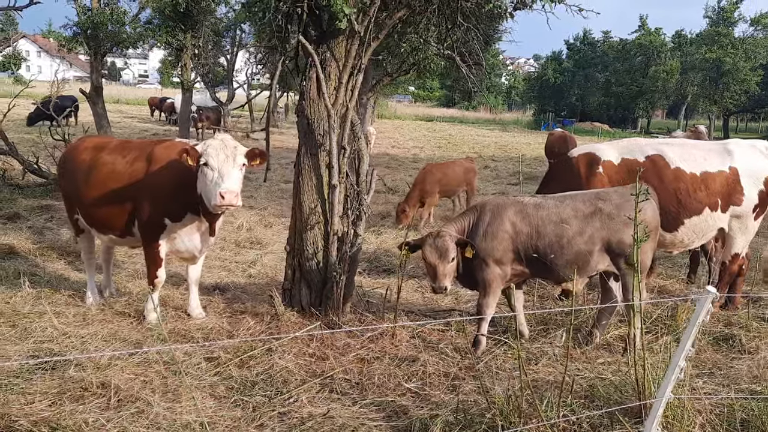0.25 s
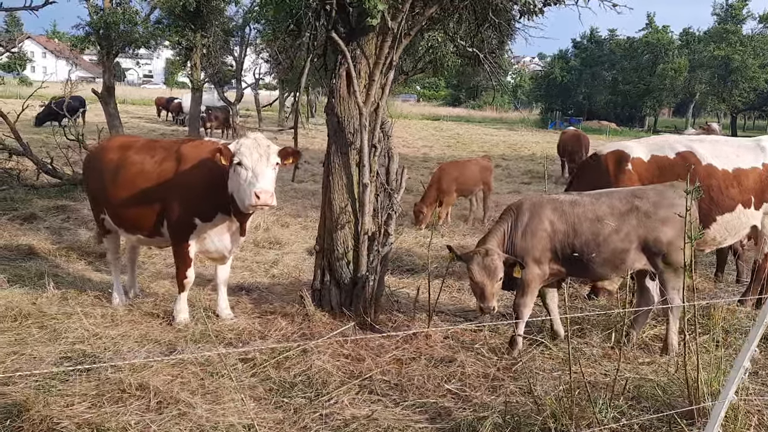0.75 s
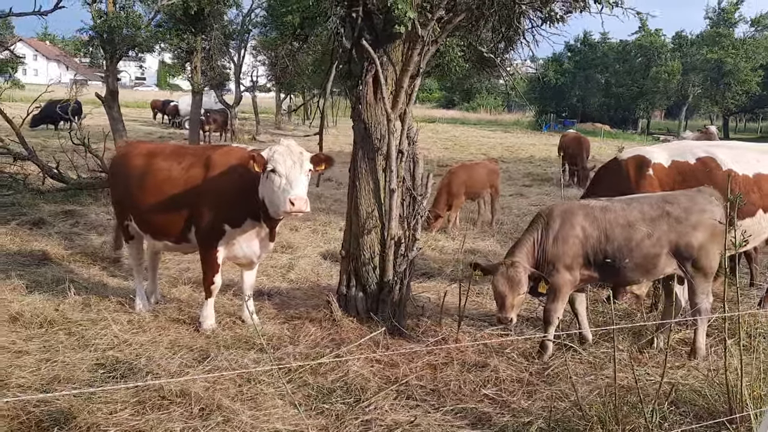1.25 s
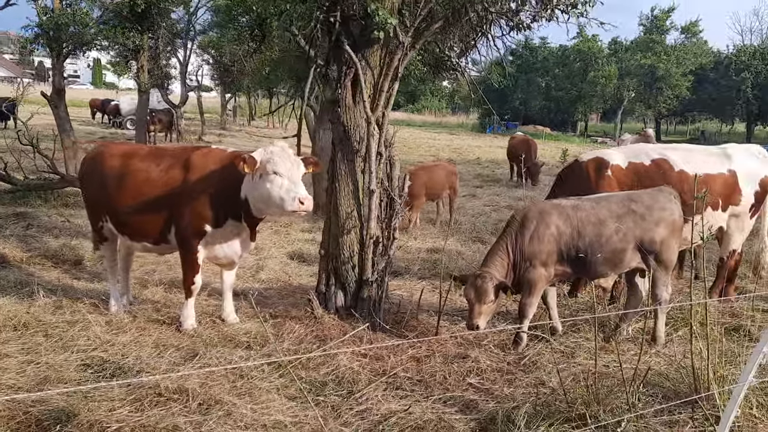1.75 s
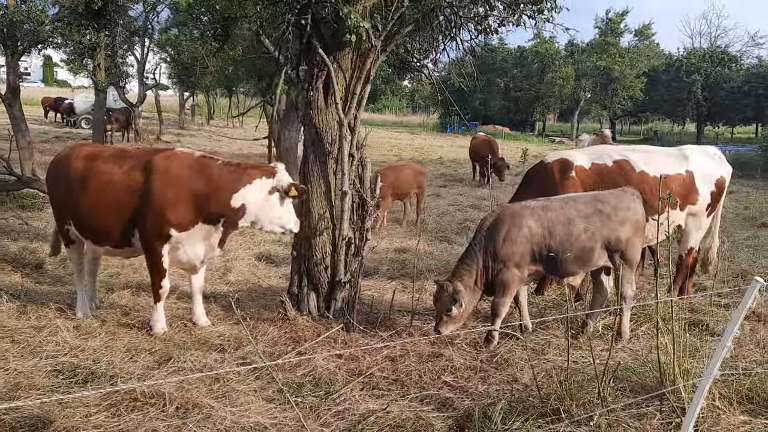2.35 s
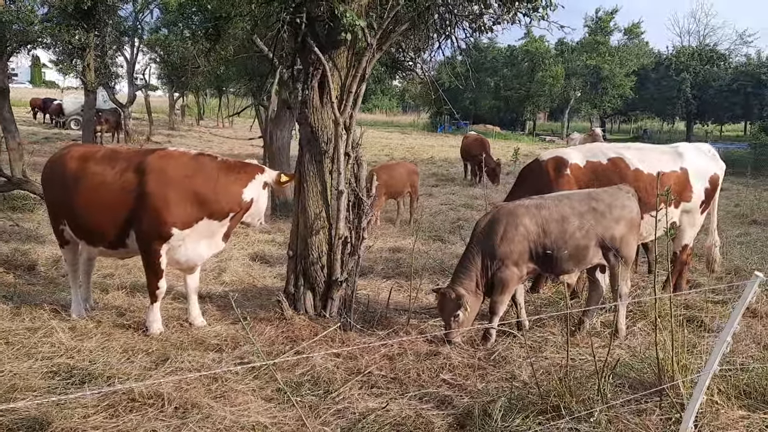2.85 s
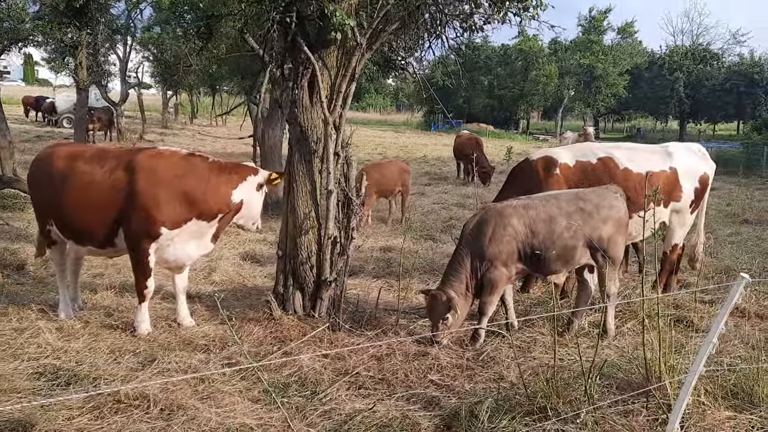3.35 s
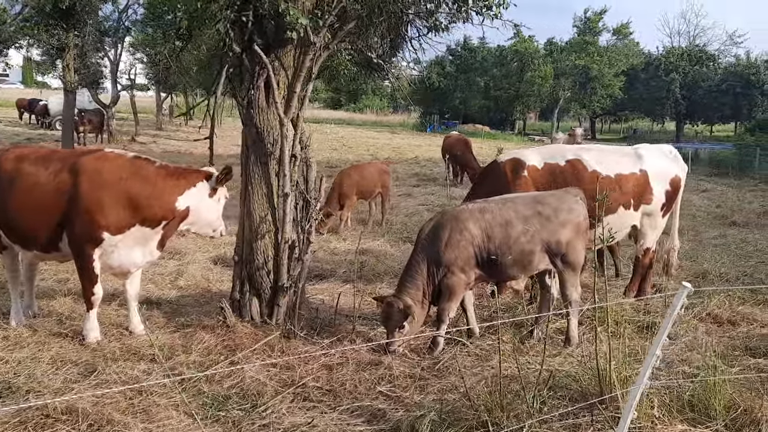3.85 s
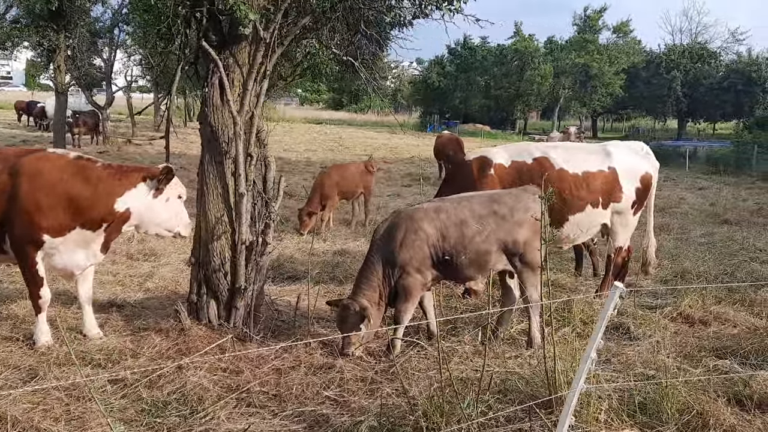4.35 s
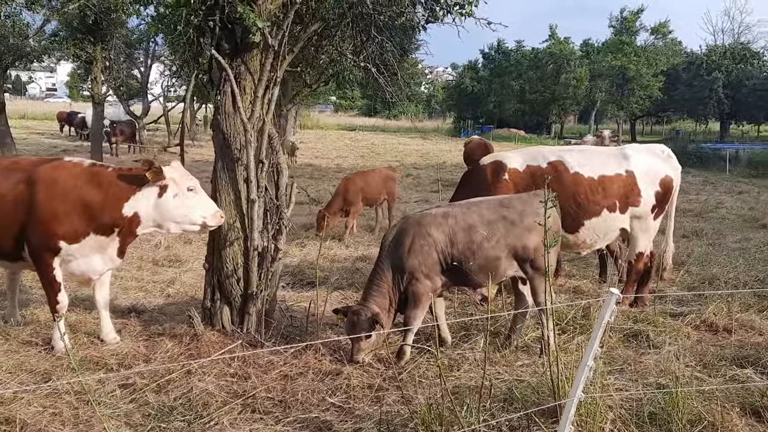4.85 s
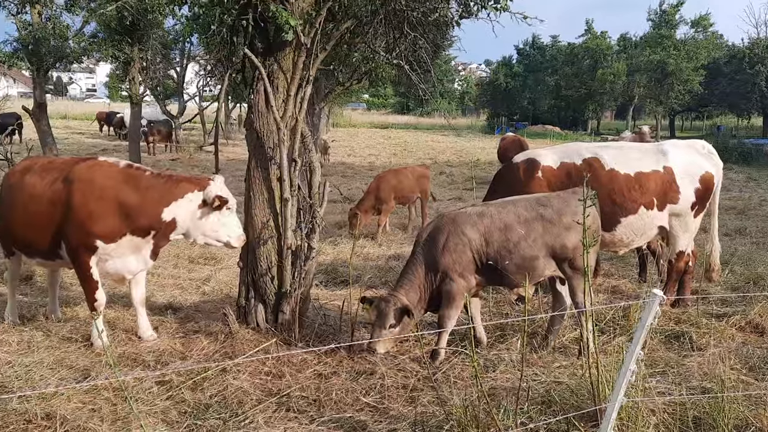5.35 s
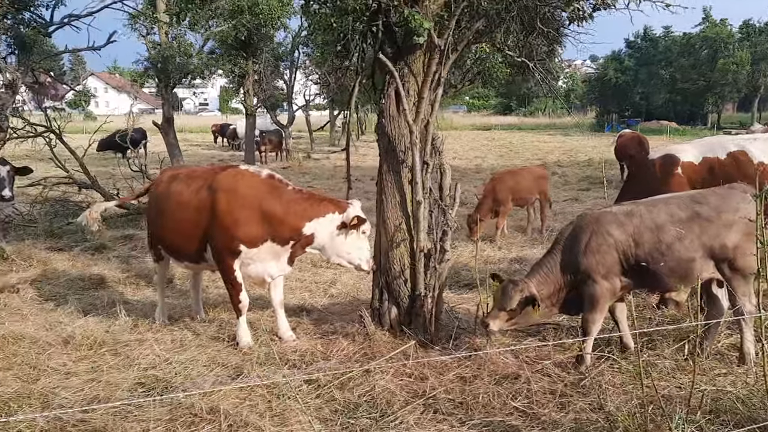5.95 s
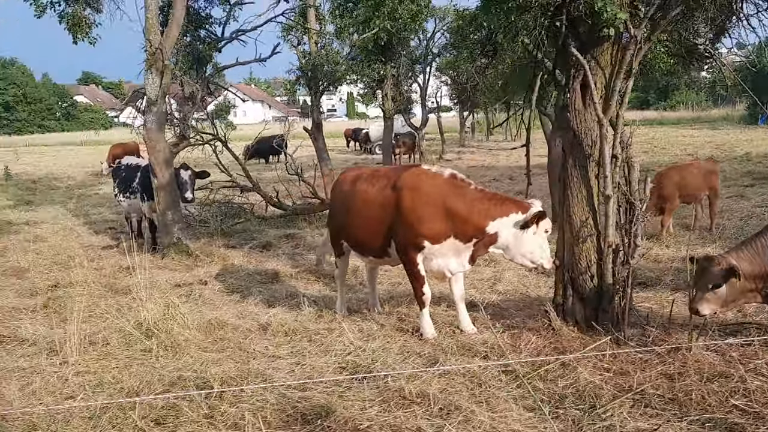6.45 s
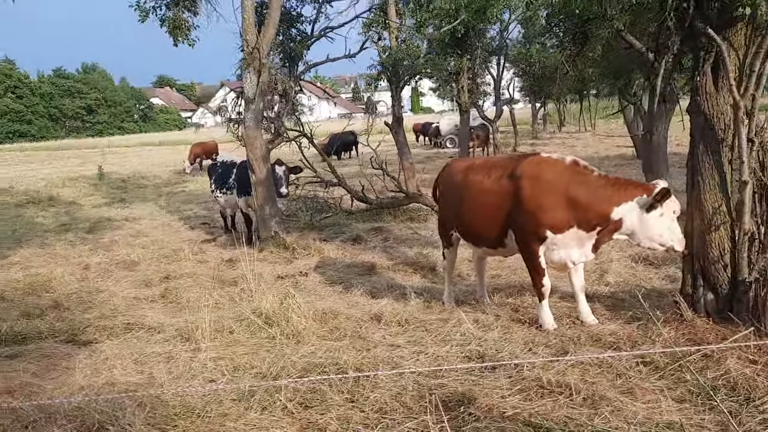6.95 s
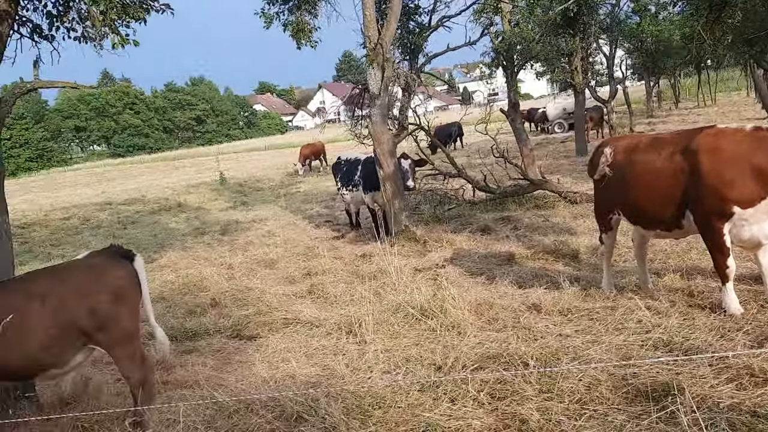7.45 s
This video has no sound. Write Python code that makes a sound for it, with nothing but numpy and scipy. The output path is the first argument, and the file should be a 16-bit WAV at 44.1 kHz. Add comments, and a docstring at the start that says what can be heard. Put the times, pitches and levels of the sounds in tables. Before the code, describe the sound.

A cow gives one long low moo that ends in a breathy break, over faint bird calls, grassy rustle and far traffic hum in an open pasture.

```python
"""A cow holds one long moo in a dry pasture; a songbird whistles and small birds buzz, stalks snap, leaves and
grass hiss, far traffic hums and wind rumbles on the microphone ports.
The moo sums overtones of one fold pulse shaped by a throat, with breath noise puffed each cycle. Whistles are
bent sines, buzzes are frequency-modulated tones, snaps are struck resonances. Hiss, hum and rumble are noise
bands that flicker; breeze and gusts drive hiss and rumble. The stereo rows are the left and right port."""
import sys
import numpy as np
from scipy import signal
from scipy.fft import rfft, irfft
from scipy.io import wavfile
from scipy.ndimage import uniform_filter1d

SR = 44100
rng = np.random.default_rng(int(sys.argv[2]) if len(sys.argv) > 2 else 0)


def materialize(psi):
    """Save the field psi as 16-bit PCM at rate SR to the path in sys.argv[1].

    A 1-D psi becomes a single channel; in a 2-D psi each row is a channel.
    """
    bounded = np.clip(np.atleast_2d(psi).T, -1, 1)
    quanta = np.round(bounded * 32767).astype(np.int16)
    wavfile.write(sys.argv[1], SR, quanta)


N = 339369   # samples

# Uneven course of the breeze: time_s, leaf_hiss_db (before the port balance), wind_rumble_db
BREEZE = [(0.0, -79, -61.5), (0.23, -72.5, -70.5), (.55, -77, -65), (0.72, -72.5, -66.5), (1.2, -78, -60.5),
          (1.48, -72, -57), (1.84, -76.5, -68), (1.95, -69.5, -71), (2.31, -71.5, -64),
          (2.61, -78.5, -66.5), (2.83, -67, -49), (3.11, -70.5, -59.5), (3.47, -55.5, -62.5),
          (4.1, -66, -64), (4.45, -70, -69), (4.82, -57.5, -65.5), (4.93, -76, -68.5), (5.23, -62, -70.5),
          (5.72, -75, -71), (6.15, -64.5, -58), (6.37, -78.5, -62.5), (6.56, -70, -62), (6.85, -83, -77),
          (7.17, -66.5, -66), (7.42, -68.5, -63), (7.7, -80, -65)]
HALVES = np.array([[.5], [-.5]])   # splits a left-minus-right difference over the two ports


def moo():
    """Source-filter principle: harmonics of the vocal folds pass the throat, with breath modulated each cycle."""
    # Voice level and vocal-tract shape through the moo: time_s, level_db, open_mouth_db, bright_throat_db
    moo_course = [(2.56, -68, -30, -29), (2.64, -60.5, -10, -14), (2.69, -50.5, -15.5, -8.5),
                  (2.794, -38, -28, -12.5), (2.93, -39, -17, -5), (3.278, -34.5, -9, -5.5),
                  (3.54, -35, -6.5, -6.5), (3.65, -36, -7, 0.5), (3.79, -37.5, -5, -2),
                  (3.99, -38.5, -12, -3), (4.02, -44, -10, -8), (4.045, -39, -20, -14),
                  (4.085, -58, -1, -2), (4.15, -74, 10, 11)]
    # Overtones at the loudest moment: multiple_of_pitch, level_db
    overtones = [(1, -30), (2, -3), (3, -20), (4, -12), (5, -12.5), (6, -15.5), (7, -17.5), (8, -9),
                 (9, -13), (10, -11.5), (11, -3), (12, -14), (13, -14), (14, -19.5), (15, -36.5),
                 (16, -25.5), (17, -29.5), (18, -23), (19, -25.5), (20, -23), (21, -22), (22, -22),
                 (23, -23.5), (24, -33.5), (25, -21), (26, -21), (27, -27.5), (28, -43), (29, -57),
                 (30, -56), (31, -33), (32, -39), (33, -35.5), (34, -37), (35, -36), (36, -41), (37, -37),
                 (38, -33), (39, -52), (40, -44), (41, -40), (42, -49)]
    # Where level, mouth, throat and top act: frequency_hz
    control_hz = [340, 800, 1800, 3500]
    break_s, break_rise_s = 4.025, .09   # the voice breaks into breath, which takes over in the time before
    voiced_breath_db, broken_breath_db = -17.5, -3   # breath against the level curve
    top_follows = 0.38   # the top overtones follow mouth and throat by this share
    nose_hz = 1480   # rings while the mouth is still closed

    first, fade, (level_db, mouth_db, throat_db) = in_time(moo_course)
    size = len(fade)
    t = (first + np.arange(size)) / SR
    hz = moo_pitch(t, break_s)
    breath_db = np.interp(t, [break_s - break_rise_s, break_s], [voiced_breath_db, broken_breath_db])
    jitter = .0008 + .12 * from_db(breath_db) ** 3   # the breathier, the less regular the folds
    phase = 2 * np.pi * np.cumsum(hz * (1 + jitter * drift(85, size=size))) / SR

    held = np.argmax(level_db)   # the overtone table holds at full voice
    top_db = top_follows * (mouth_db + throat_db)
    controls = np.array([0 * hz, mouth_db, throat_db, top_db])
    controls = controls - controls[:, [held]]
    unrest = .015 * drift(2.5, size=size)   # tongue and jaw never hold still
    orders, orders_db = np.transpose(overtones)
    out, turn = np.zeros((2, N)), ringing_phase(orders_db)
    for k in orders:
        place = np.interp(np.log(k * hz[held]), np.log(control_hz), np.arange(4))
        low = min(int(place), 2)
        shape_db = controls[low] + (place - low) * (controls[low + 1] - controls[low])
        if k > 3:   # upper overtones slide through the throat's resonances as the pitch moves
            throat_order = k * hz / hz[held] * (1 + unrest * min(k / 14, 1))
            shape_db += np.interp(throat_order, orders, orders_db)
            shape_db -= .5 * np.minimum(controls[1], 0) * np.exp(-((k * hz - nose_hz) / 130) ** 2)
        else:
            shape_db += orders_db[int(k) - 1]
        # moving air makes high overtones waver, a little apart at each port
        unsteady = min(k / 9, 1)
        port_wobble = np.array([drift(4, size=size), drift(4, size=size)])
        wobble_db = unsteady * (2 * drift(5, size=size) + 1.6 * port_wobble)
        apart = unsteady * 0.5 * drift(1.5, size=size) * [[1], [-1]]   # radians
        gain = np.sqrt(2) * from_db(level_db + shape_db + wobble_db) * fade
        pulse_phase = turn[int(k)] - 0.0316 * k * k   # the square term disperses the pulse
        add(out, first, gain * np.cos(k * phase + apart + pulse_phase))

    puffs = rng.standard_normal((3, size)) * (1 + 0.33 * np.cos(phase))
    puffs = puffs[0] + 0.16 * puffs[1:]   # mostly shared by the ports
    add(out, first, throat_breath(puffs) * from_db(level_db + breath_db) * fade)
    # the ground bounce arrives at a different moment at each port
    left = out[0] + 0.38 * late(out[0], 0.00034)
    right = late(out[1], .00007) + .5 * late(out[1], 0.00039)
    # thin nostril hiss reaches the left port only
    nostril = signal.sosfilt(signal.butter(4, 8800, "high", fs=SR, output="sos"), puffs[0])
    add(left, first, rms_one(nostril) * from_db(level_db - 25.5) * fade)
    voice = np.array([left * from_db(1.5), right * from_db(-1.5)])
    return voice + from_db(-15) * trees(voice, t60=.4)


def moo_pitch(t, break_s):
    """Exponential relaxation in Hz: climbs to the held note, sags as the air runs out, flips up at the break."""
    climb_from_s, held_hz, rise_hz, rise_s = 2.48, 169.7, 44, .17   # rise_s is a time constant
    sag_hz, sag_s = 24, .04
    break_hz, flip_hz, fall_s = 163, 40, .025   # after the break it falls back with this time constant
    climb = held_hz - rise_hz * np.exp(-(t - climb_from_s) / rise_s)
    voiced = climb - sag_hz * np.exp(np.minimum(t - break_s, 0) / sag_s)
    broken = break_hz + flip_hz * np.exp(-np.maximum(t - break_s, 0) / fall_s)
    return uniform_filter1d(np.where(t < break_s, voiced, broken), size=600)


def ringing_phase(orders_db):
    """Minimum phase from the log spectrum: every fold pulse starts sharply and then rings in the throat."""
    level = np.log(from_db(np.pad(orders_db, (1, 64 - len(orders_db)), "edge")))
    folded = irfft(level)
    folded[1:64] *= 2
    folded[65:] = 0
    return rfft(folded).imag


def throat_breath(puffs):
    """Formant filtering: parallel resonances of alternating sign color the turbulent breath."""
    # Resonances of the breath: centre_hz, width_hz, level_db
    breath_bands = [(146, 48, 1), (310, 77, 7.5), (825, 560, -5.5), (1360, 270, 1), (1920, 270, -3),
                    (2130, 73, 2.5), (3830, 700, -5), (6040, 1000, -28)]
    bands = [(-1) ** k * from_db(db) * resonance(puffs, hz, width)
             for k, (hz, width, db) in enumerate(breath_bands)]
    return rms_one(sum(bands))


def songbird():
    """Pure tones with discrete reflections: walls and tree rows echo the whistles, leaves blur them."""
    # Whistled notes: start_s, length_s, first_hz, turn_hz, last_hz, loudest_db (before port balance), loudest_share
    notes = [(1.05, 0.16, 1585, 1970, 1815, -73.5, 0.19), (1.24, 0.079, 1620, 1660, 1870, -74.5, 0.54),
             (1.29, 0.2, 2255, 1970, 2510, -72.5, 0.83), (4.07, 0.2012, 1800, 1816, 1940, -71, .1),
             (4.15, .22, 2056, 2016, 2430, -64.5, 0.75), (4.4, 0.18, 2576, 2596, 2590, -61, 0.74),
             (4.59, 0.216, 2190, 2140, 2120, -62, 0.4), (6.09, 0.19, 1554, 1720, 1920, -64, 0.43),
             (6.41, 0.21, 2340, 1980, 2497, -68.5, 0.49)]
    # Echoes from walls and tree rows: delay_s, level_db
    echoes = [(.065, -8), (.13, -21), (.2, -20.5), (.31, -16)]
    song = whistles(notes)
    song = song + sum(from_db(db) * late(song, delay_s) for delay_s, db in echoes)
    ports = np.array([song * from_db(7.0), late(song, 0.00049) * from_db(-1.5)])
    return ports + from_db(-2) * trees(song, t60=.3)


def rising_tones():
    """Pure tones without reflections: faint glides rise before the moo and near its end, equal at both ports."""
    # Gliding notes: start_s, length_s, first_hz, turn_hz, last_hz, loudest_db, loudest_share
    glides = [(2.38, .3, 339, 373, 438, -69, .4), (3.89, 0.082, 2280, 2470, 3000, -53.5, 0.47)]
    return whistles(glides)


def whistles(notes):
    """Frequency glide of near sines that waver in strength; each note can bend once and swells once."""
    turn_share, settle_share = 0.31, .85   # of the length: where a note turns and reaches its last pitch
    start_db, end_db = -5.5, -7   # ends of a note against its loudest point
    out = np.zeros(N)
    for s, length, first_hz, turn_hz, last_hz, db, loudest in notes:
        first, fade, (share,) = in_time([(s, 0), (s + length, 1)], fade_s=0.013)
        hz = np.interp(share, [0, turn_share, settle_share], [first_hz, turn_hz, last_hz])
        level_db = db + np.interp(share, [0, np.clip(loudest, .02, .98), 1], [start_db, 0, end_db])
        tone = np.sin(2 * np.pi * np.cumsum(hz * (1 + 0.004 * drift(57, size=len(hz)))) / SR)
        add(out, first, np.sqrt(2) * tone * fade * from_db(level_db + 3.9 * drift(30, size=len(hz))))
    return out


def buzzes():
    """Frequency modulation: a warble sweeps a tone, a faster rasp roughens it, two upper partials ride above."""
    # Buzzing calls: start_s, length_s, first_hz, last_hz, after_attack_db, before_release_db,
    # sweep_depth (share of pitch, weighted below), left_minus_right_db, upper_partials_db,
    # direct_db (share of power heard directly; the rest comes scattered by the leaves)
    calls = [(0.101, 0.31, 4770, 3800, -65.5, -68, 0.14, 0, -7, -9),
             (0.796, 0.43, 4090, 3236, -59.5, -70.5, 0.19, 3.5, -15, -4),
             (1.328, 0.35, 4210, 4006, -58.5, -67, 0.12, 2.5, -16, -5),
             (1.618, 0.55, 3600, 3304, -72.5, -67, .17, 4, -10, -8.5),
             (2.374, .4, 2550, 2636, -69.5, -71, 0.048, -2, -32, -6),
             (2.663, 0.33, 4370, 3860, -54, -56, .2, 1.05, -15, -3.5),
             (5.297, 0.27, 4274, 3794, -57.5, -52, 0.14, 0.5, -13, -1.5),
             (5.824, 0.66, 4090, 2920, -61, -67.5, 0.15, 2.5, -15.5, -4.5),
             (6.715, 0.08, 3500, 3570, -60.5, -70, 0.047, 8.5, -24, -1),
             (6.796, 0.36, 3985, 3780, -60.5, -63.5, 0.14, 3.2, -15, -4.5),
             (7.09, 0.2, 4660, 3980, -47, -54, 0.098, 2.5, -8, -5),
             (7.292, 0.2, 4190, 3670, -64.5, -68.5, 0.26, 3, -15, -2.5)]
    warble_hz, rasp_hz = 43.1, 208
    attack_s, release_s, ends_db = .05, .08, -8
    direct, hidden = np.zeros((2, 2, N))
    for s, length, first_hz, last_hz, early_db, late_db, depth, side_db, upper_db, direct_db in calls:
        envelope = [(s, early_db + ends_db), (s + attack_s, early_db),
                    (s + max(length - release_s, attack_s), late_db), (s + length, late_db + ends_db)]
        first, fade, (level_db,) = in_time(envelope, fade_s=0.031)
        size = len(fade)
        hz = np.geomspace(first_hz, last_hz, size)
        warble = 2 * np.pi * np.cumsum(warble_hz * (1 + 0.0397 * drift(5.43, size=size))) / SR
        rasp = 2 * np.pi * np.cumsum(rasp_hz * (1 + 0.0932 * drift(18.6, size=size))) / SR
        swing = .3 + .85 * np.sin(warble) + .4 * np.sin(rasp) + .3 * drift(120, size=size)
        phase = 2 * np.pi * np.cumsum(hz * (1 + depth * swing)) / SR
        beat = from_db(-30 * depth * np.sin(warble) + 3 * drift(100, size=size))   # loudest at the low turn
        upper = np.sin(1.5 * phase) + 0.52 * np.sin(1.85 * phase)
        tone = (np.sin(phase) + from_db(upper_db) * upper) * beat
        call = rms_one(tone) * fade * from_db(level_db + HALVES * side_db)
        direct_gain = from_db(min(direct_db, 0))
        add(direct, first, call * direct_gain)
        add(hidden, first, call * np.sqrt(1 - direct_gain ** 2))
    return np.array([direct[0], late(direct[1], .0004)]) + trees(hidden, t60=.3)


def snaps():
    """Impulsive excitation of a broad resonance: stalks break sharply and small knocks die in noise."""
    # Snapping stalks and knocks: start_s, peak_db (before the split), centre_hz, t60_s, left_minus_right_db
    breaks = [(.668, -49.5, 597, 0.011, 5), (0.671, -50.5, 2030, 0.0067, 12), (.671, -50, 7060, 0.0061, 13),
              (.816, -56, 4500, 0.013, 5), (1.037, -50, 5900, 0.0092, 0), (1.064, -53, 5000, 0.0092, -8),
              (1.93, -55, 1010, 0.02, 5), (2.16, -50.5, 910, .03, 0), (4.465, -48, 660, 0.17, 3),
              (4.480, -40, 1600, 0.11, 6), (4.504, -39.5, 1690, 0.027, 4), (5.801, -50.5, 7100, 0.01, 5),
              (5.888, -58, 9000, 0.0099, 20), (6.060, -49, 9150, 0.015, 11),
              (6.165, -42.5, 5200, 0.058, -4), (7.015, -41, 620, 0.025, 4), (7.095, -53, 1370, 0.016, 11),
              (7.347, -47.5, 4000, 0.01, 15)]
    out, t = np.zeros((2, N)), np.arange(4000) / SR
    for s, peak_db, hz, t60, side_db in breaks:
        force = rng.standard_normal(len(t)) * from_db(-60 * t / t60)
        force[:max(round(SR / hz / 3), 1)] = -1.2   # the break pushes one way for a third of a cycle
        burst = resonance(force, hz, 0.44 * hz)
        add(out, round(s * SR), burst / np.abs(burst).max() * from_db(peak_db + HALVES * side_db))
    return out


def leaf_hiss(gust_hiss):
    """Turbulent rustling: broadband noise of leaves and dry grass follows breeze and gusts."""
    # Spectrum of the hiss: frequency_hz, density_db (per Hz, relative)
    hiss_spectrum = [(1470, -38), (2500, 21), (2740, -18.5), (3780, 9.5), (4540, -3), (5990, 7),
                     (7890, 7.5), (9270, 7.5), (13100, 8), (15600, -36)]
    leaves = banded_noise(hiss_spectrum, patchy_db=1.3, alike=0.037, right_lag_s=0) * crackle(per_s=12.0)
    top, rustle = [signal.sosfilt(signal.butter(6, 9300, kind, fs=SR, output="sos"), leaves)
                   for kind in ("high", "low")]
    top = rms_one(top) * from_db(np.array([[4.5], [-4.5]]))   # only the top of the hiss leans left
    rustle = rms_one(rustle) * from_db(1.5)
    return (top + rustle) * np.hypot(from_db(breeze_db()[0]), gust_hiss)


def crackle(per_s):
    """Poisson impulses: dry grass ticks make the gain jump at random moments and die in milliseconds."""
    ticks = (rng.random(N) < per_s / SR) * rng.random(N)
    return 1 + 1.14 * signal.lfilter([1], [1, -np.exp(-1 / (0.0076 * SR))], ticks + 1e-18)


def traffic_hum():
    """Superposition of many noise bands: the low hum of far traffic swells and sinks."""
    # Spectrum of the traffic: frequency_hz, density_db (per Hz, relative)
    hum_spectrum = [(76, -11), (130, 4), (215, -5), (307, 3), (429, -6), (1000, 4), (1930, -21.5),
                    (2140, -20), (2490, -40.5), (2800, -14.5), (3640, -65), (6160, -120)]
    # Slow swell of the traffic: time_s, swell_db
    swell = [(0, -1.5), (2.2, -0.5), (4.0, -1), (4.8, 1), (6.2, -1), (7.2, 1), (7.7, -1.5)]
    swell_db = np.interp(np.arange(N) / SR, *np.transpose(swell))
    hum = banded_noise(hum_spectrum, patchy_db=.8, alike=.6, right_lag_s=.00047)
    return hum * from_db(-63 + swell_db + np.array([[2.5], [-.4]]))


def wind_rumble(gust_rumble):
    """Flow noise: wind on the microphone ports makes low noise; breeze and gusts add in power."""
    # Spectrum of wind on the ports: frequency_hz, density_db (per Hz, relative)
    rumble_spectrum = [(12, -39), (20, -36), (36, -10.5), (59, -1.5), (81, -2.5), (200, -26.5), (260, -20),
                       (440, -120)]
    rumble = banded_noise(rumble_spectrum, patchy_db=2., alike=.45, right_lag_s=.0005)
    return rumble * np.hypot(from_db(breeze_db()[1]), gust_rumble)


def breeze_db():
    """Piecewise-linear level envelopes of leaf hiss and wind rumble, padded to the full length."""
    _, _, columns = in_time(BREEZE)
    return [np.pad(c, (0, N - len(c)), "edge") for c in columns]


def gusts():
    """Amplitude modulation: each gust is one smooth bump in the rumble at each port and in the leaf hiss."""
    # Gusts on ports and leaves: centre_s, half_length_s, rumble_db, left_minus_right_db, leaf_hiss_db
    gust_rows = [(.41, 0.077, -54, 12, -78), (0.637, .08, -64, 23, -95), (0.862, 0.13, -56, 9, -94),
                 (1.483, 0.18, -56.5, -10, -86), (1.94, 0.11, -62, -6, -72), (2.825, 0.21, -55, -5, -71),
                 (3.95, 0.58, -59.5, -6, -83), (6.066, 0.11, -59.5, -24, -69),
                 (6.171, 0.096, -47, -14, -59), (6.82, 0.089, -62, -16, -77.5),
                 (6.958, 0.13, -61.5, 11, -78), (7.176, 0.053, -57, 6, -83)]
    rumble, hiss = np.zeros((2, N)), np.zeros(N)
    for centre_s, half_s, rumble_db, side_db, hiss_db in gust_rows:
        first = int((centre_s - half_s) * SR)
        bump = np.hanning(int(2 * half_s * SR))
        add(rumble, first, bump * from_db(rumble_db + HALVES * side_db))
        add(hiss, first, bump * from_db(hiss_db))
    return rumble, hiss


def banded_noise(spectrum, patchy_db, alike, right_lag_s):
    """Partial coherence: third-octave noise bands flicker; their shared part reaches the right port later."""
    out, (low_hz, _), (high_hz, _) = 0, spectrum[0], spectrum[-1]
    edges = low_hz * 2 ** np.arange(0, np.log2(high_hz / low_hz), 1 / 3)
    white = rng.standard_normal((2, 3, N))
    together = drift(2.13)   # flicker common to all bands
    pairs = []
    for w in white:
        shared = np.array([w[0], late(w[0], right_lag_s)])
        pairs.append(np.sqrt(alike) * shared + np.sqrt(1 - alike) * w[1:])
    for k, (low, high) in enumerate(zip(edges, np.append(edges[1:], high_hz))):
        bandpass = signal.butter(2, [low, high], "band", fs=SR, output="sos")
        band = signal.sosfilt(bandpass, pairs[k % 2])   # neighbors use different noise
        flicker_db = patchy_db * (drift(9.0) + 1.97 * together)
        out = out + band * from_db(at_hz(spectrum, np.sqrt(low * high)) + flicker_db)
    return rms_one(out)


def trees(x, t60):
    """Diffuse scattering: leaves and trunks spread sound into a smooth tail, different at each port."""
    t = np.arange(int(t60 * SR)) / SR
    tail = rng.standard_normal((2, len(t))) * from_db(-60 * t / t60) * np.clip(t / 0.025, 0, 1)
    tail /= np.sqrt(np.sum(tail ** 2, axis=1, keepdims=True))
    return signal.fftconvolve(np.broadcast_to(x, (2, N)), tail, axes=1)[:, :N]


def resonance(x, hz, width):
    """Damped two-pole resonator: bandwidth in Hz sets the decay; gain is about 1 at the peak."""
    r = np.exp(-np.pi * width / SR)
    zeros = np.array([1, 0, -1]) * (1 - r * r) / 2
    return signal.lfilter(zeros, [1, -2 * r * np.cos(2 * np.pi * hz / SR), r * r], x)


def drift(rate, size=N):
    """Low-pass filtered chance of spread about 1, with its corner set by rate in Hz."""
    r = np.exp(-80 * np.pi * rate / SR)   # drawn every 40 samples
    slow = signal.lfilter([1], [1, -2 * r, r * r], rng.standard_normal(size // 40 + 1002))[1000:]
    spread = np.sqrt((1 + r * r) / (1 - r * r) ** 3)
    return np.interp(np.arange(size) / 40, np.arange(len(slow)), slow / spread)


def late(x, seconds):
    """Propagation delay in whole samples."""
    n = max(round(seconds * SR), 0)
    return np.concatenate([np.zeros(n), x[:len(x) - n]])


def in_time(rows, fade_s=0.0093):
    """Linear envelope: first sample, a fade window and the columns of a curve over its own span."""
    s, *columns = np.transpose(rows)
    first = max(int(s[0] * SR), 0)
    t = np.arange(first, min(int(s[-1] * SR), N)) / SR
    fade = np.clip(np.minimum(t - s[0], s[-1] - t) / fade_s, 0, 1)
    return first, fade, [np.interp(t, s, c) for c in columns]


def at_hz(points, hz):
    """Spectral interpolation on a log-frequency axis."""
    points_hz, points_db = np.transpose(points)
    return np.interp(np.log(hz), np.log(points_hz), points_db)


def from_db(db):
    """Logarithmic level in dB to amplitude gain."""
    return 10 ** (np.asarray(db) / 20)


def rms_one(x):
    """Power normalization: scales to rms 1."""
    return x / np.sqrt(np.mean(x ** 2) + 1e-20)


def add(out, first, x):
    """Superposition: mixes x in from sample first."""
    out[..., first:first + x.shape[-1]] += x[..., :N - first]


def scene():
    """Superposition of all sources in the pasture."""
    gust_rumble, gust_hiss = gusts()
    animals = moo() + songbird() + rising_tones() + buzzes()
    background = leaf_hiss(gust_hiss) + traffic_hum() + wind_rumble(gust_rumble)
    return animals + snaps() + background


def record(dry):
    """Band limiting: the microphone drops the deepest bass; the top is cut."""
    dry = signal.sosfilt(signal.butter(4, 38, "high", fs=SR, output="sos"), dry)
    return signal.sosfilt(signal.ellip(12, .5, 75, 15680, fs=SR, output="sos"), dry)


dry = scene()
out = record(dry)
materialize(out)
```